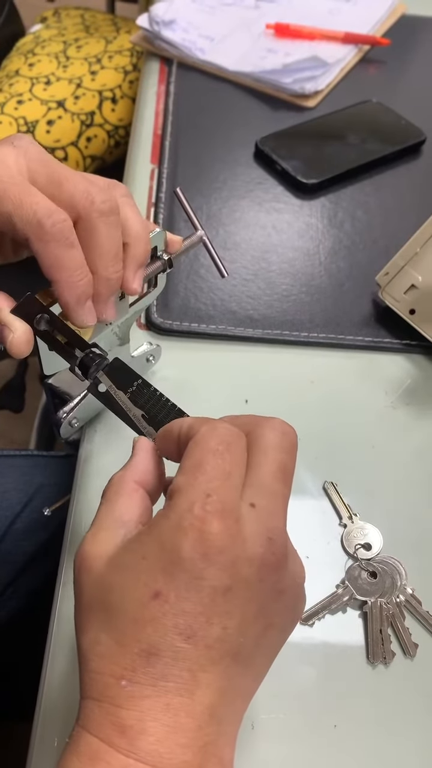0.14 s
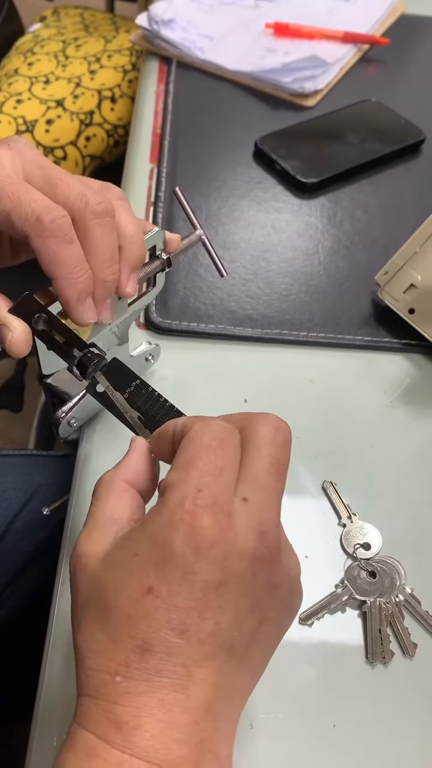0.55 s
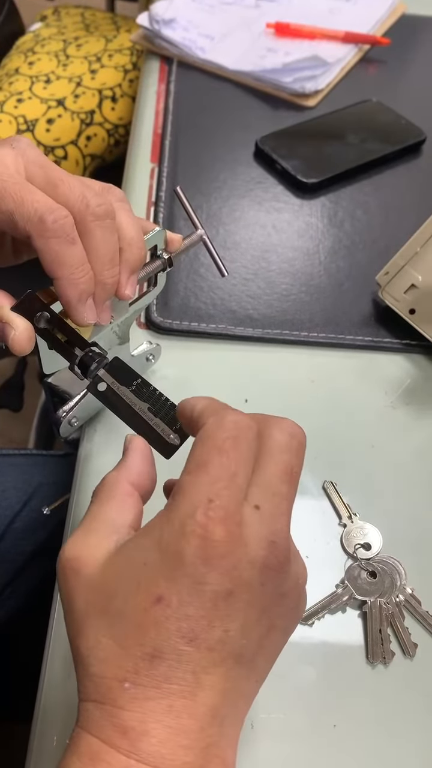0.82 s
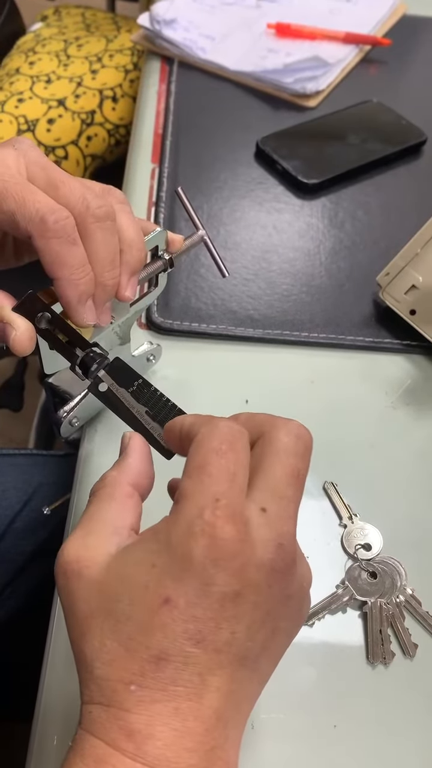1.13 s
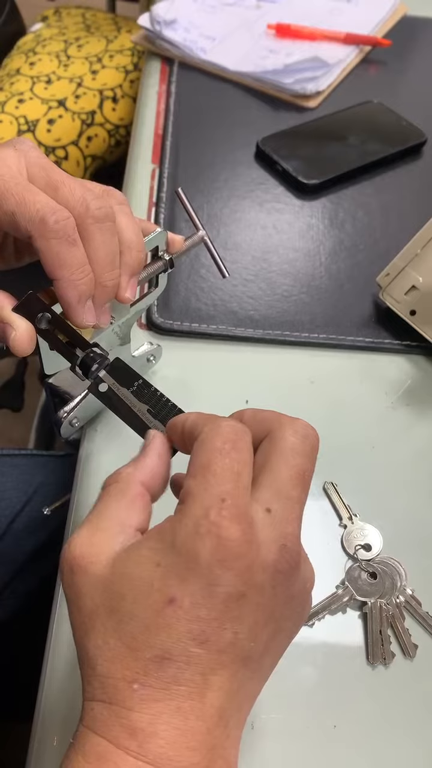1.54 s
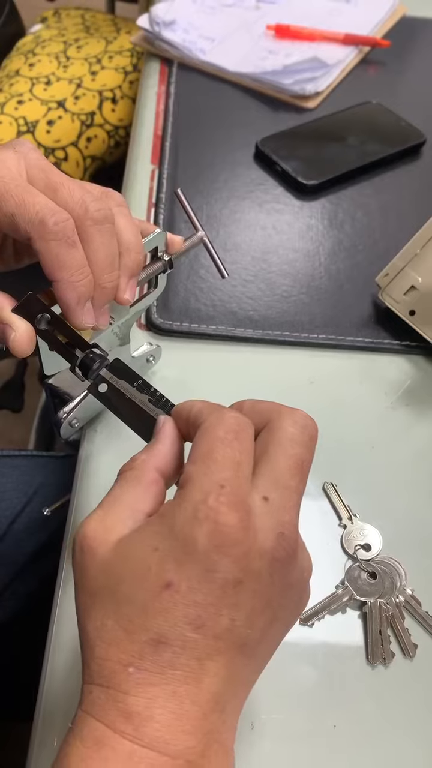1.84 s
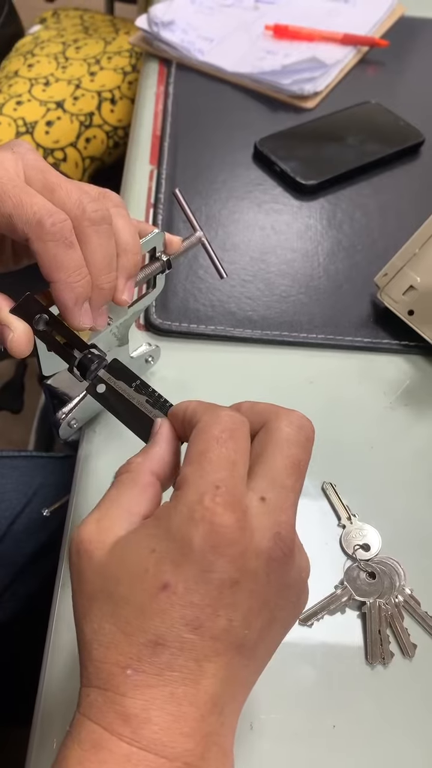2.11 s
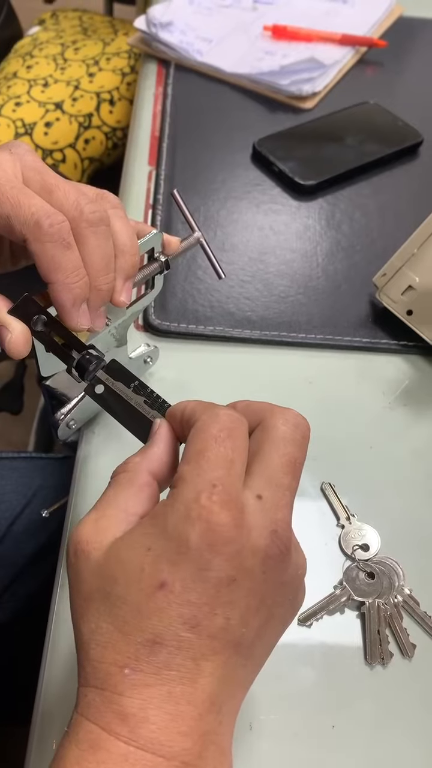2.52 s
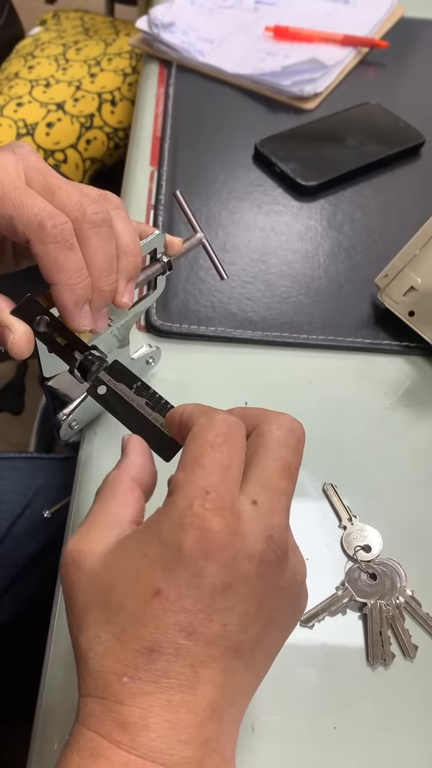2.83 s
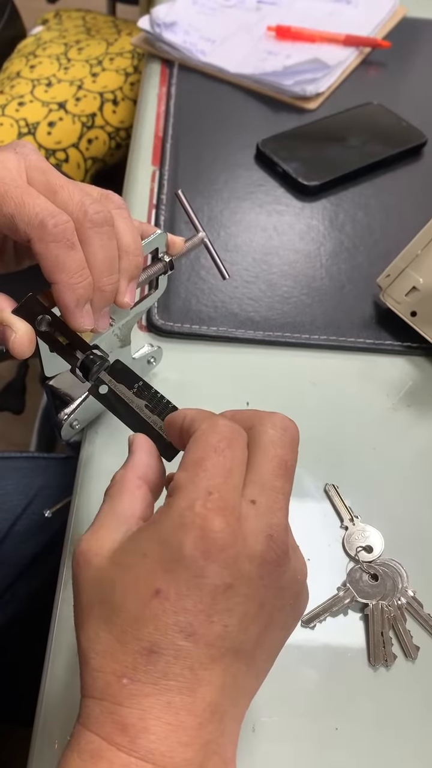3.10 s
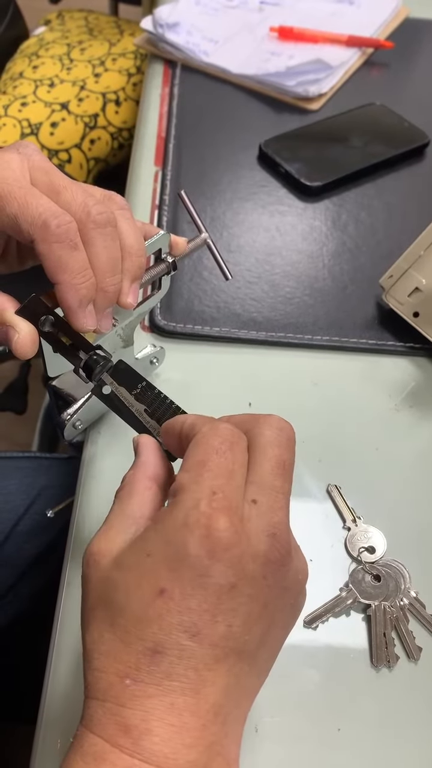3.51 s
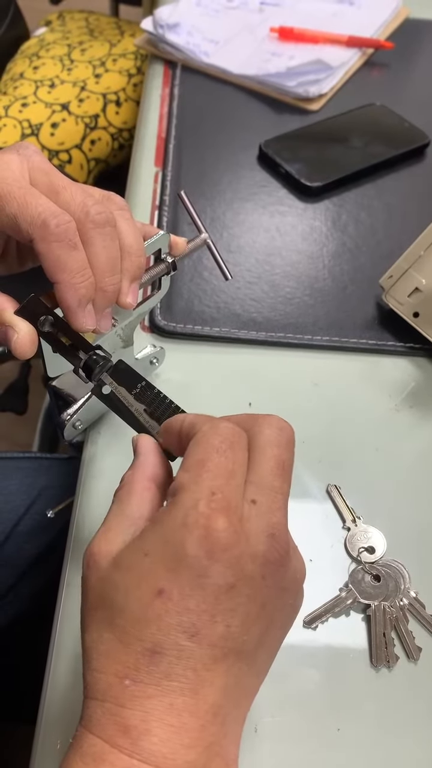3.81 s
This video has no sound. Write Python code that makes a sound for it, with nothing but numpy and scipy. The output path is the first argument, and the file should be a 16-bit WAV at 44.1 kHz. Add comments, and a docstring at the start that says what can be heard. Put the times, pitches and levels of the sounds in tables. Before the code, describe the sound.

Sharp metallic clicks of a pick working a small lock, over low room ventilation and hum

```python
"""A desk in a room: a steel pick lifts the pins of a small lock held in a vice, close to a phone microphone.
Each gritty contact rings decaying sines of pins, pick and lock body; band noise knocks the desk top,
slides scrape, and a noise tail returns the snaps from the walls. Behind lie shaped noise for ventilation
and rumble, wandering sines for hum, drone, fan, a far engine and whistle. A narrow band near 9.9 kHz is
dipped, the very top is cut, and weak patches of the spectrum drop into holes."""
import sys
import numpy as np
from scipy import signal
from scipy.fft import rfft, irfft
from scipy.io import wavfile
from scipy.ndimage import uniform_filter1d, minimum_filter1d

SR = 44100
rng = np.random.default_rng(int(sys.argv[2]) if len(sys.argv) > 2 else 0)


def ratio_of_db(decibels):
    """Turn decibels (scalar or array-like) into linear amplitude factors; 0 dB maps to 1."""
    return 10 ** (np.asarray(decibels, float) / 20)


def to_wav(s):
    """Save 16-bit WAV."""
    ch = np.atleast_2d(s).T  # columns
    pcm = np.round(np.clip(ch, -1, 1) * 32767)  # PCM
    wavfile.write(sys.argv[1], SR, pcm.astype(np.int16))


N = 174195


def evened(x):
    """Scales a signal to an rms of 1."""
    return x / np.sqrt(np.mean(x ** 2) + 1e-20)


def read(points, hz):
    """Reads a spectrum table along a logarithmic frequency axis."""
    f, value = np.transpose(points)
    return np.interp(np.log(hz + 1), np.log(f + 1), value)


def over_time(curve, t):
    """Reads a table of times and values in straight lines."""
    return np.interp(t, *np.transpose(curve))


def add(mix, s, sound):
    """Lays a sound into the mix at s seconds, cut off at the end of the mix."""
    part = mix[round(s * SR):][:len(sound)]
    part += sound[:len(part)]


def noise(field_db, size):
    """Random short-time spectra weighted by a function of frequency and time, slightly patchy."""
    patchy_db = 1.5
    hop = size // 4
    frames, hz = N // hop + 5, np.fft.rfftfreq(size, 1 / SR)
    real, imaginary, c = rng.standard_normal((frames, len(hz), 3)).T
    patches = evened(uniform_filter1d(uniform_filter1d(c, size=12, axis=0), size=10, axis=1))
    level_db = field_db(hz[:, None], np.arange(frames) * hop / SR) + patchy_db * patches
    z = (real + 1j * imaginary) * ratio_of_db(level_db)
    return signal.istft(z, nperseg=size, noverlap=size - hop)[1][:N]


def tone(hz, db, width_hz, fuzz):
    """A sine whose size and phase wander: smoothed noise widens its spectral line."""
    r = np.exp(-np.pi * width_hz / SR)
    a, b = signal.lfilter([1], [1, -2 * r, r * r], rng.standard_normal((2, N)))
    wobble = 1 + fuzz * (evened(a) + 1j * evened(b))
    turning = np.exp(2j * np.pi * np.cumsum(hz * np.ones(N)) / SR)
    return ratio_of_db(db) * evened((wobble * turning).real)


def glide(rows, width_hz, fuzz):
    """A wandering tone that follows a table of pitch and level."""
    t, (s, hz, db) = np.arange(N) / SR, np.transpose(rows)
    return tone(np.interp(t, s, hz), np.interp(t, s, db), width_hz, fuzz)


def air():
    """Ventilation noise that sinks and swells again; each band follows to its own degree, the top least."""
    # Each row: frequency in Hz, relative level in dB per Hz
    spectrum = [(90, -53), (150, 0), (196, 0.5), (293, -13), (350, -14), (438, -12), (750, -15),
                (1490, -17), (2410, -26.5), (2700, -26), (3250, -30.5), (3800, -29), (4200, -31.5),
                (4900, -38.5), (6000, -34), (7030, -33), (8350, -38), (9300, -54), (10500, -48),
                (13000, -45), (13700, -51), (14200, -63)]
    # Each row: time in seconds, level in dB before the lift
    swell = [(0.0, -50.5), (0.58, -50.5), (0.74, -51), (1.53, -54.5), (2.11, -56), (2.38, -56.5),
             (2.66, -55), (3.21, -54.5), (3.64, -50.5), (3.95, -52)]
    lift_db = 3.5
    mean_db = np.mean([db for s, db in swell])

    def field_db(hz, t):
        follows = read([(200, 0.92), (450, 0.69), (2000, 0.95), (6000, 0.66)], hz)
        return read(spectrum, hz) + follows * (over_time(swell, t) - mean_db)

    return ratio_of_db(mean_db + lift_db) * evened(noise(field_db, size=1024))


def rumble():
    """Low building rumble, noise with a steady spectrum."""
    # Each row: frequency in Hz, relative level in dB per Hz
    spectrum = [(8.8, -62), (15, -8), (54, 5), (120, 4.5), (141, 4), (167, -17), (220, -3), (260, -28.5),
                (340, -32), (570, -120)]
    return ratio_of_db(-46) * evened(noise(lambda hz, t: read(spectrum, hz) + 0 * t, size=4096))


def hum():
    """Mains hum, a slightly wandering tone whose level dips late and partly returns."""
    # Each row: time in seconds, level in dB
    level = [(0, -48.5), (1.2, -45), (2.5, -44.5), (2.9, -51.5), (3.95, -48)]
    return tone(119.4, over_time(level, np.arange(N) / SR), width_hz=17.6, fuzz=0.28)


def drone():
    """A low drone of wavering pitch and level."""
    # Each row: time in seconds, pitch in Hz, level in dB
    path = [(0, 60.1, -51), (.4, 64.44, -41.5), (1.2, 64.63, -48.5), (1.75, 60.03, -43.5),
            (2.05, 62.5, -49.5), (2.4, 66, -47.5), (2.9, 59.83, -53.5), (3.2, 68.3, -44.5),
            (3.5, 73.6, -47), (3.95, 63.6, -54.5)]
    return glide(path, width_hz=17.6, fuzz=0.72)


def fan():
    """Faint narrow hiss bands of a fan, tones fuzzed until noise outweighs them."""
    # Each row: frequency in Hz, width in Hz, level in dB
    bands = [(195, 8.3, -61), (490, 29, -67), (627.6, 29, -69), (2076, 43, -76.5), (2880, 72, -74.5),
             (5730, 95, -82.5)]
    return sum(tone(hz, db, width_hz, fuzz=2.8) for hz, width_hz, db in bands)


def engine():
    """A distant engine, very faint at first, that rises in level and pitch as it speeds up."""
    # Each row: time in seconds, pitch in Hz, level in dB
    path = [(2.5, 100.5, -67), (2.8, 103.2, -46), (3.3, 114.8, -44.5), (3.651, 123, -48.5),
            (3.85, 137.7, -42), (3.95, 138, -52)]
    return glide(path, width_hz=12.6, fuzz=0.24)


def whistle():
    """A very faint falling whistle."""
    # Each row: time in seconds, pitch in Hz, level in dB
    path = [(2.52, 12200, -100), (2.58, 11800, -90), (2.68, 11100, -90), (2.76, 10600, -100)]
    return glide(path, width_hz=120, fuzz=0.73)


def contact(grit, share, db):
    """Grit swells and dies within milliseconds around one sharp seating; a damped blow is also shorter."""
    contact_s = 0.0018
    u = np.arange(len(grit)) / SR / (contact_s * share)
    force = grit * u ** 2 * np.exp(-2 * u)
    # seating over grit: -1.5 dB, and 2.6 dB more for each dB the contact lies under -31 dB
    seat = ratio_of_db(-1.5 - 2.6 * min(db + 31, 0))
    force = force / np.linalg.norm(force) + seat * (np.arange(len(u)) == np.argmax(u > .8))
    return force / np.linalg.norm(force)


def ring(modes, share, luck):
    """Sum of sines that build briefly and die, peak 1; luck scatters each mode's level and pitch."""
    scatter_db, detune, build_s = -5, 0.0051, 0.00038
    t = np.arange(3000) / SR
    hz, db, t60 = np.transpose(modes)[:, :, None]
    db = db + scatter_db * luck[:len(modes), None]
    hz = hz * (1 + detune * luck[::-1][:len(modes), None])
    decay = ratio_of_db(db - 60 * t / np.maximum(share * t60, .001))
    x = (decay * np.sin(2 * np.pi * hz * t)).sum(0)
    x *= 1 - np.exp(-t / (share * build_s))
    return x / np.abs(x).max()


def metal(force, pins_db, pick_db, body_db, share, luck, crack_db):
    """A gritty force drives the three metal parts and is also heard as a bare, unringing crack."""
    # Each row, in all three: frequency in Hz, relative level in dB, free t60 in seconds
    pin_modes = [(7435, -3.5, 0.03), (7620, -3, 0.018), (8150, -15, .008), (8410, -0.5, 0.016),
                 (8630, 1.5, .019), (8620, -9.5, .015), (13280, -7, 0.021)]
    pick_modes = [(10700, -12, .01), (11140, -1, .012), (11300, -3, .013), (11860, -3, 0.015),
                  (11680, 3.5, 0.013), (13120, -7.5, 0.0089), (13600, -4.5, .012), (13600, -6, 0.0092)]
    body_modes = [(1470, -14, .015), (2060, -2, 0.013), (2806, 0.5, 0.075), (3100, -10, 0.012),
                  (3670, 3.5, 0.042), (4030, 6, .02), (4600, 4.5, 0.022), (5290, -1, 0.032),
                  (6000, 5, .012), (6240, 7, 0.012)]
    parts = ring(pin_modes, share, luck[0])
    parts += ratio_of_db(pick_db) * ring(pick_modes, share, luck[1])
    parts += ratio_of_db(body_db) * ring(body_modes, share, luck[2])
    out = signal.fftconvolve(force, parts)
    out[:len(force) - 1] += ratio_of_db(crack_db) * np.diff(force, 2, append=0) / 2
    return ratio_of_db(pins_db) * out


def clicks():
    """Pick contacts, as heard directly and as the shorter snaps that are sent to the walls."""
    # Each row: start in seconds, pins in dB, pick in dB over pins, lock body in dB over pins,
    # ring length as share of a free ring
    contacts = [(0.3504, -35, 10, -16, 0.8), (0.3517, -20.5, -8, -19, 0.4), (0.3522, -34.5, 15.5, -5, 0.7),
                (0.355, -43.5, 1, 6.5, 0.92), (0.358, -48.5, 4, 1, 0.8), (0.676, -48, -6, -17, 0.56),
                (0.6854, -26.5, -11, -16.5, 0.93), (0.8896, -24.5, -12.5, -17, 0.88),
                (0.902, -47.5, -10, 2.5, 0.55), (1.02, -56, -3, -6, 0.69), (1.0301, -61, 1.5, 0, 0.6),
                (1.075, -49, -18, 3, 0.73), (1.0897, -25, -11, -15.5, 0.81), (1.1871, -68, 1, 5, 0.73),
                (1.1947, -52.5, -15, -10, 0.73), (1.233, -54.5, -4, -12, 0.74), (1.2647, -61, -2, 3, 0.72),
                (1.347, -54, 1, -9, 0.68), (1.3804, -58, -14, -6, 0.6), (1.4072, -53, 1, -7, 0.68),
                (1.5044, -58.5, -7, 2.5, 0.48), (1.5827, -59.5, -11, -7.5, 0.6),
                (1.6178, -42.5, -9, -6.5, 0.75), (2.1906, -66, 4, -8, 0.8), (3.5642, -47, 6.5, -2, 0.38),
                (3.5658, -24.5, -8.5, -24, 0.42), (3.5707, -35.5, -10, -10.5, 0.66),
                (3.824, -59, -33.5, -19, 0.73), (3.874, -27, -10, -15.5, 0.45)]
    crack_db, snap_share = -13, 0.076
    direct, snaps = np.zeros((2, N))
    for (s, *dbs, share), draw in zip(contacts, rng.standard_normal((len(contacts), 630))):
        luck = draw[:30].reshape(3, -1)
        louder_db = max(dbs[0], dbs[0] + dbs[1])  # pins or pick
        force = contact(draw[30:], share, louder_db)
        add(direct, s, metal(force, *dbs, share, luck, crack_db))
        add(snaps, s, metal(force, *dbs, snap_share, luck, crack_db))
    return direct, snaps


def room(x):
    """Dense noise tail from the walls that fades in over 3.4 ms, each band dying at its own speed."""
    # Each row: frequency in Hz, t60 in seconds
    decay = [(1000, 0.12), (4000, 0.067), (8000, 0.4), (12000, 0.52)]
    hz, t, z = signal.stft(rng.standard_normal(SR // 2), SR, nperseg=128)
    tail = signal.istft(z * ratio_of_db(-60 * t / read(decay, hz)[:, None]), SR, nperseg=128)[1]
    tail *= np.clip(np.arange(len(tail)) / SR / 0.0034, 0, 1) ** 2
    return ratio_of_db(-15.5) * signal.fftconvolve(x, tail / np.linalg.norm(tail))[:N]


def thud(db, hz, t60, grit):
    """The desk top answers with a dull knock, band noise that builds over about three cycles as it dies."""
    t = np.arange(len(grit)) / SR
    band = signal.butter(2, [hz * .55, hz * 1.7], "band", fs=SR, output="sos")
    knock = evened(signal.sosfilt(band, grit))
    return ratio_of_db(db - 60 * t / t60) * np.minimum(t * hz / 3.3, 1) * knock


def thuds():
    """All the desk knocks."""
    # Each row: start in seconds, level in dB, centre in Hz, t60 in seconds
    knocks = [(0.351, -44, 1300, 0.034), (.356, -42, 390, 0.29), (.891, -48, 1490, 0.032),
              (1.091, -49, 1465, .025), (1.098, -40, 280, 0.096), (3.5659, -31, 1100, .016)]
    out = np.zeros(N)
    for (s, *row), grit in zip(knocks, rng.standard_normal((len(knocks), 8000))):
        add(out, s, thud(*row, grit))
    return out


def scrapes():
    """The pick slides: spiky grit grows until the slide stops, driving short damped rings."""
    # Each row: start in seconds, length in seconds, pins in dB
    slides = [(0.64, 0.042, -61.5), (1, 0.022, -54), (1.072, 0.03, -59.5), (1.413, 0.0089, -66),
              (1.48, 0.042, -63), (3.81, 0.027, -73), (1.016, 0.019, -66), (2.185, 0.014, -73),
              (1.1, .01, -70), (3.874, .012, -58), (1.23, .012, -68), (1.258, 0.014, -64.5),
              (1.3, 0.0074, -65)]
    out = np.zeros(N)
    for (s, length, db), draw in zip(slides, rng.standard_normal((len(slides), 4030))):
        u = np.arange(4000) / SR / length
        spiky = draw[30:] * abs(draw[30:])
        force = 0.122 * spiky * np.sqrt(u) * (u < 1)
        luck = draw[:30].reshape(3, -1)
        add(out, s, metal(force, db, pick_db=0.9, body_db=-15, share=0.27, luck=luck, crack_db=-20))
    return out


def dip_and_top_cut(x):
    """A narrow dip near 9.9 kHz and a steep cut above 13.9 kHz."""
    hz = np.fft.rfftfreq(x.shape[1], 1 / SR)
    dip = ratio_of_db(-21 * np.exp(-((hz - 9900) / 420) ** 4))
    return irfft(rfft(x) * dip / (1 + (hz / 13900) ** 60), x.shape[1])


def spectral_holes(x):
    """Holes in the sound: spectral patches that sink under a threshold are pushed further down."""
    # Each row: frequency in Hz, threshold in dB against the usual level
    thresholds = [(250, -13), (340, -3.5), (450, -6.5), (1500, -19), (2200, -1.5), (3400, -1.5),
                  (4900, 1.6), (5600, 0.5), (6300, -8), (9000, -7), (10500, -14)]
    depth_db = -22
    hz, t, z = signal.stft(x, SR, nperseg=2048, noverlap=1024)
    level_db = 10 * np.log10(abs(uniform_filter1d(abs(z) ** 2, size=5, axis=1)) + 1e-20)
    smooth_db = uniform_filter1d(uniform_filter1d(level_db, size=15, axis=2), size=15, axis=1)
    usual_db = minimum_filter1d(smooth_db, size=21, axis=2)  # the quietest nearby moment
    over_db = level_db - usual_db - read(thresholds, hz)[:, None]
    gain = ratio_of_db(depth_db * np.clip(.5 - over_db, 0, 1))
    return signal.istft(z * gain, SR, nperseg=2048, noverlap=1024)[1][:, :N]


def scene():
    """The lock, its room return and the desk close by, over the background of the room."""
    background = air() + rumble() + hum() + drone() + fan() + engine() + whistle()
    direct, snaps = clicks()
    near = direct + room(snaps) + thuds() + scrapes()
    return (near + background)[None]


def top_cut(x):
    """Nothing passes above the cut-off."""
    return signal.sosfilt(signal.butter(12, 14700, fs=SR, output="sos"), x)


def record(dry):
    """The dip and top cut, then the holes in weak patches, give the finished mix."""
    mix = spectral_holes(dip_and_top_cut(dry))
    return top_cut(mix)


dry = scene()
out = record(dry)
to_wav(out)
```